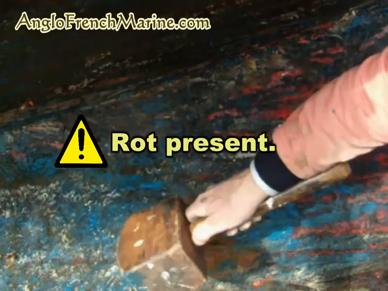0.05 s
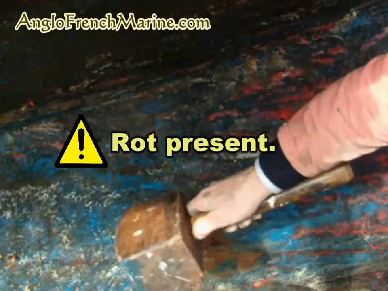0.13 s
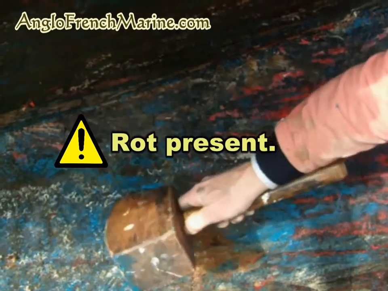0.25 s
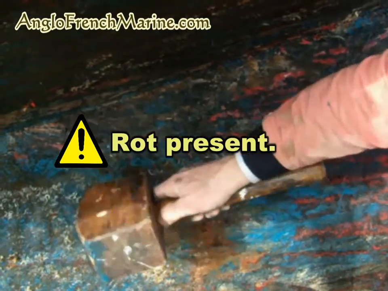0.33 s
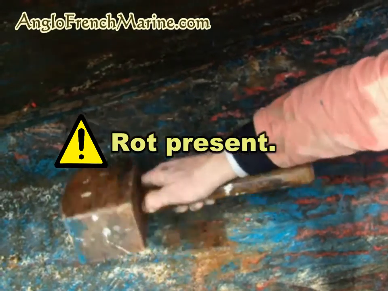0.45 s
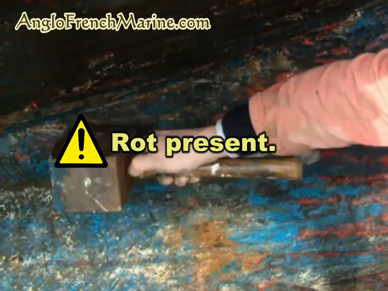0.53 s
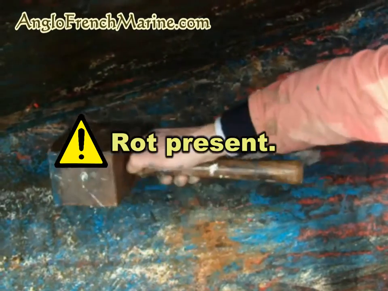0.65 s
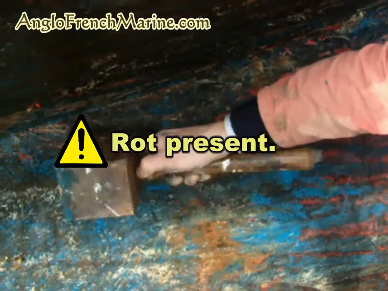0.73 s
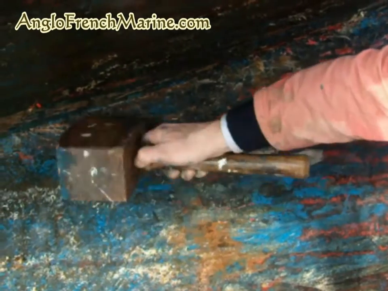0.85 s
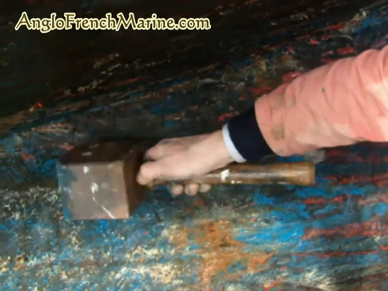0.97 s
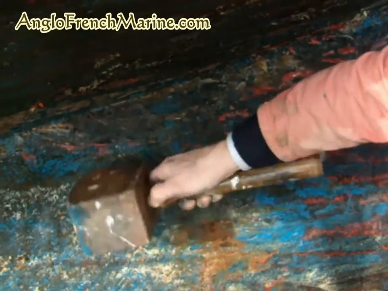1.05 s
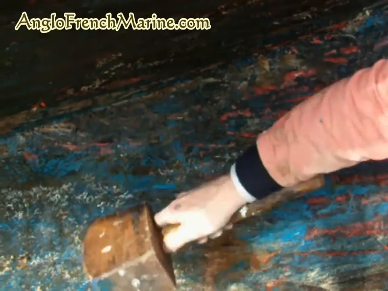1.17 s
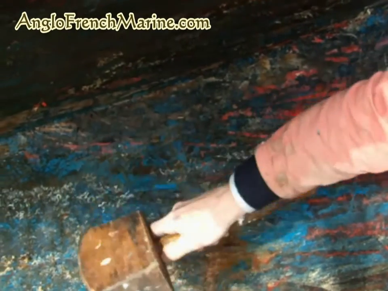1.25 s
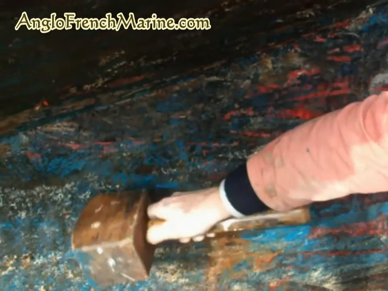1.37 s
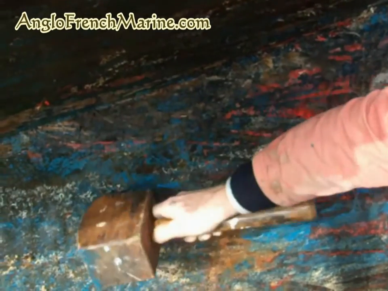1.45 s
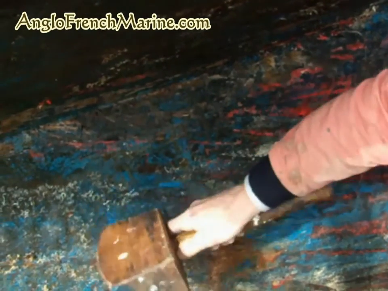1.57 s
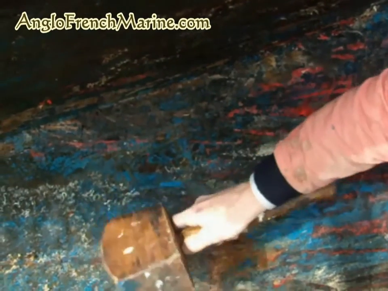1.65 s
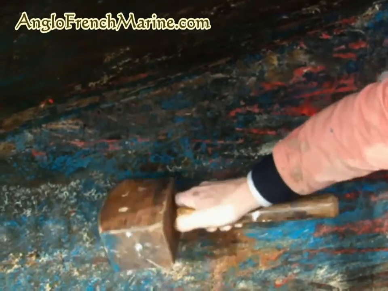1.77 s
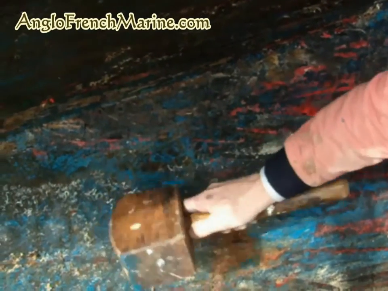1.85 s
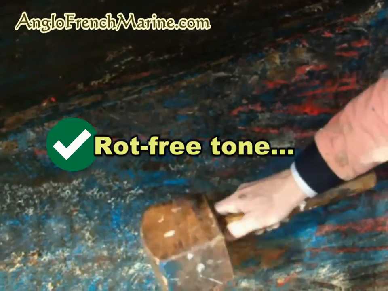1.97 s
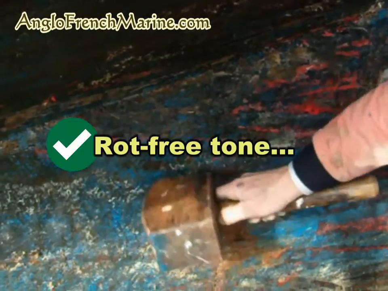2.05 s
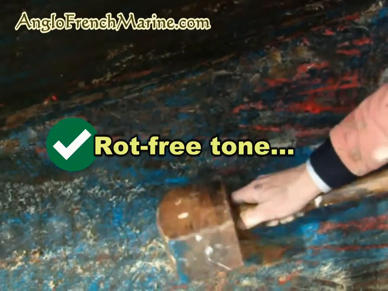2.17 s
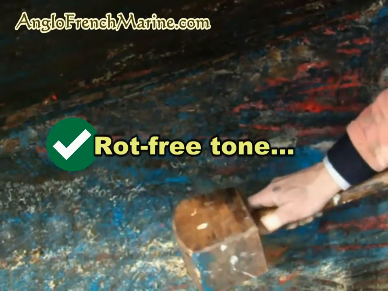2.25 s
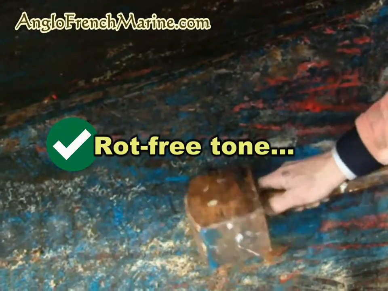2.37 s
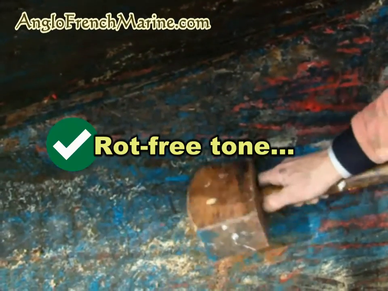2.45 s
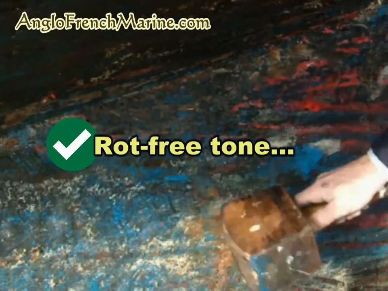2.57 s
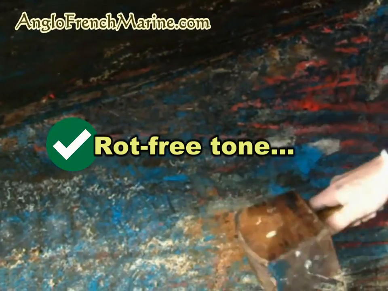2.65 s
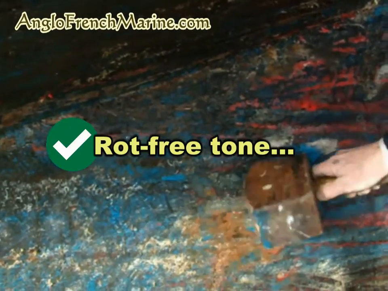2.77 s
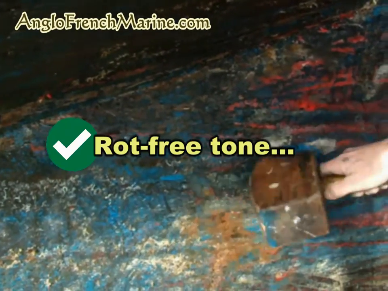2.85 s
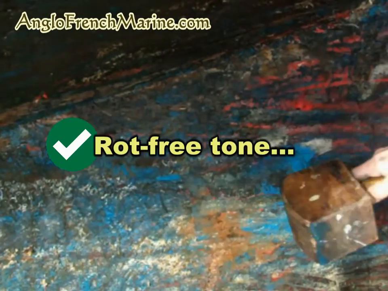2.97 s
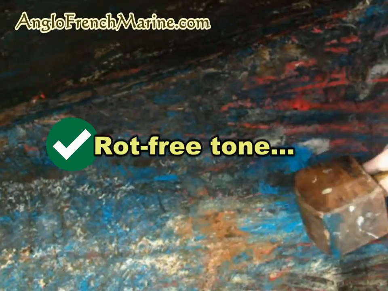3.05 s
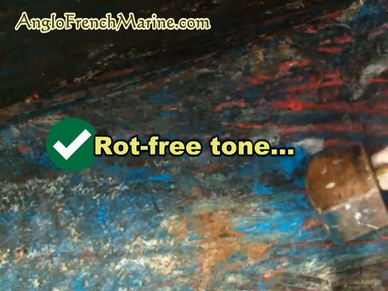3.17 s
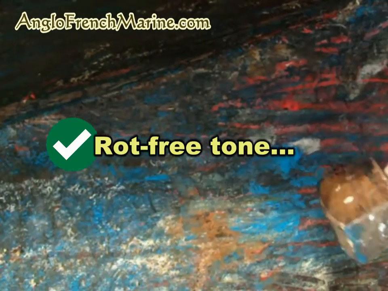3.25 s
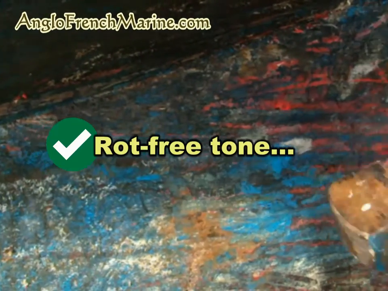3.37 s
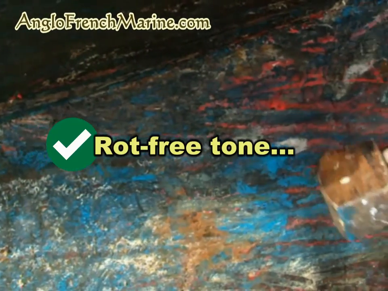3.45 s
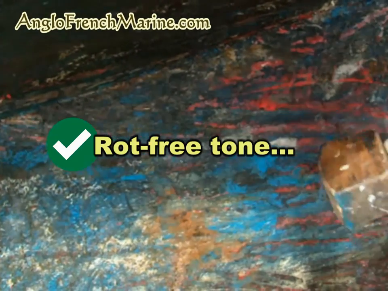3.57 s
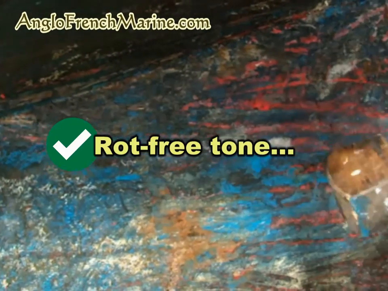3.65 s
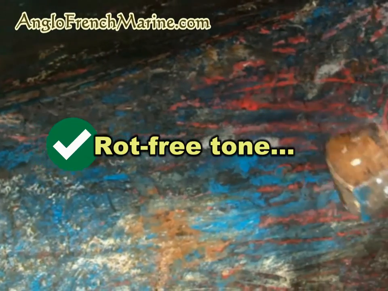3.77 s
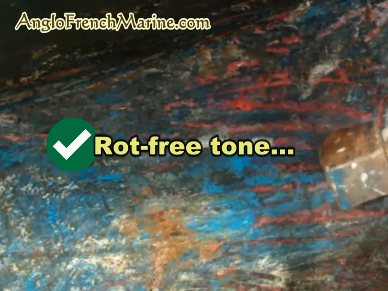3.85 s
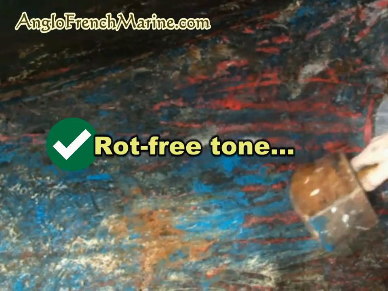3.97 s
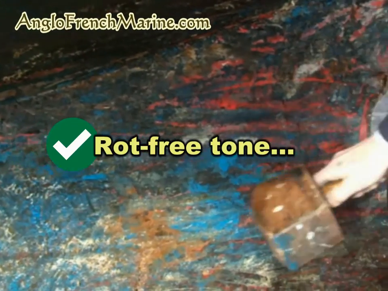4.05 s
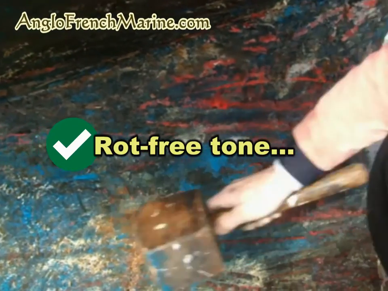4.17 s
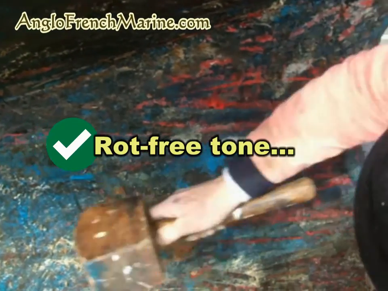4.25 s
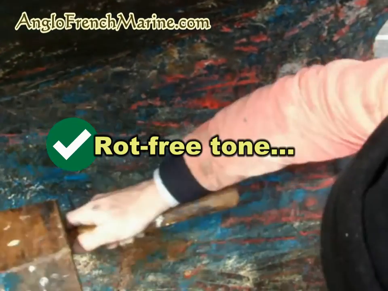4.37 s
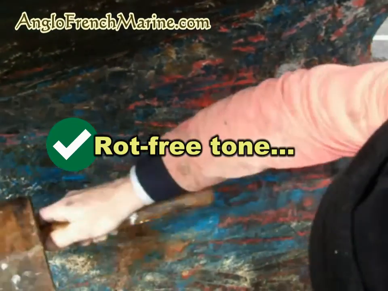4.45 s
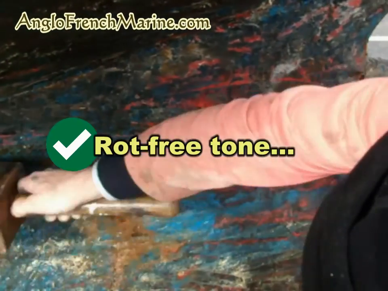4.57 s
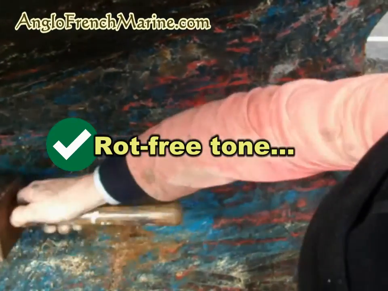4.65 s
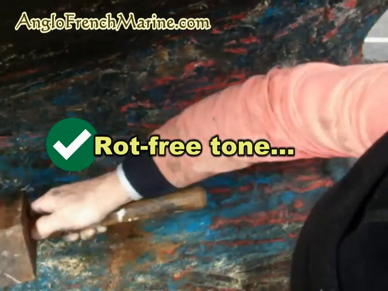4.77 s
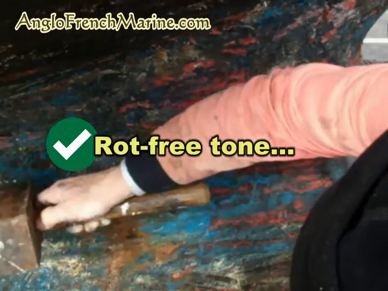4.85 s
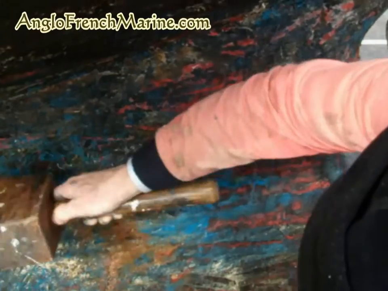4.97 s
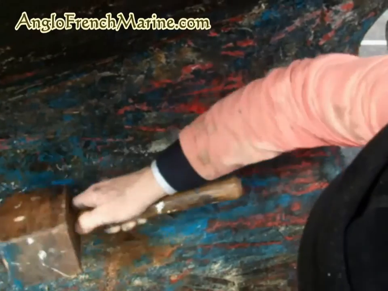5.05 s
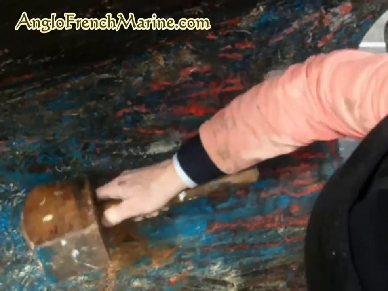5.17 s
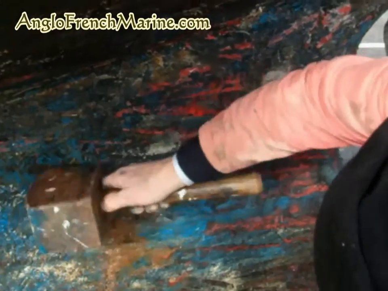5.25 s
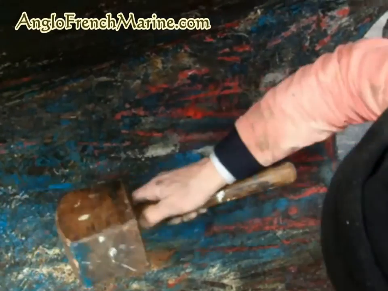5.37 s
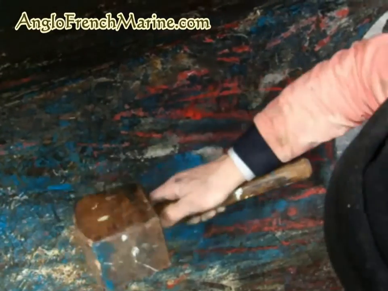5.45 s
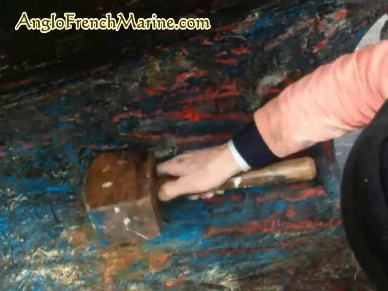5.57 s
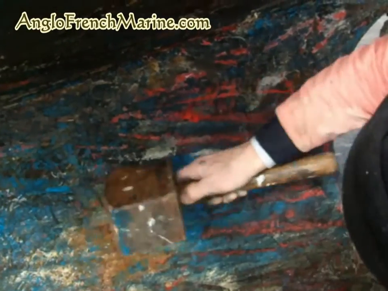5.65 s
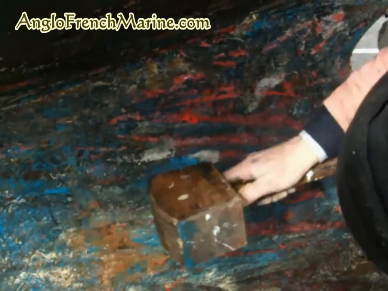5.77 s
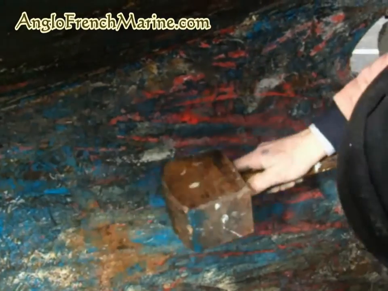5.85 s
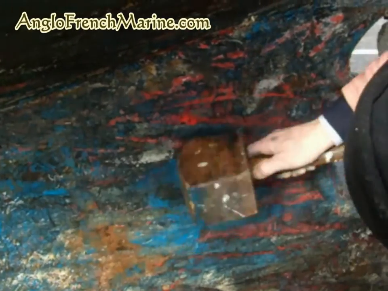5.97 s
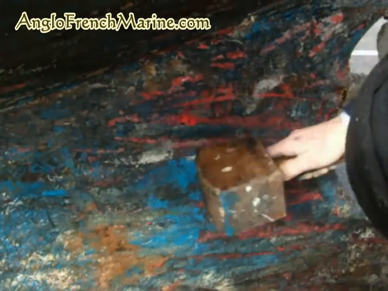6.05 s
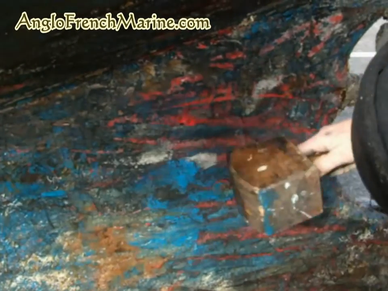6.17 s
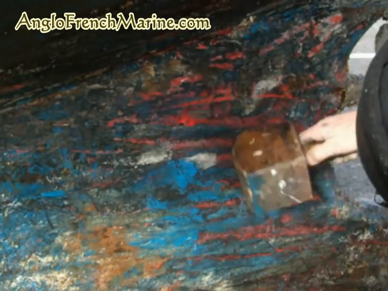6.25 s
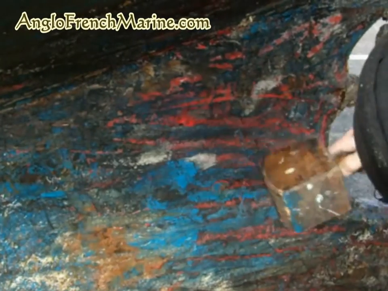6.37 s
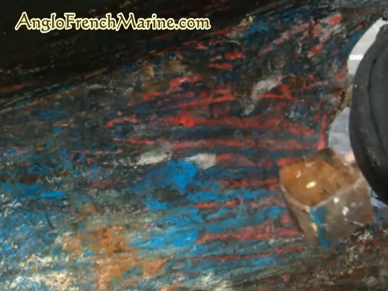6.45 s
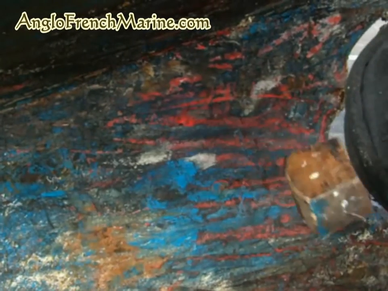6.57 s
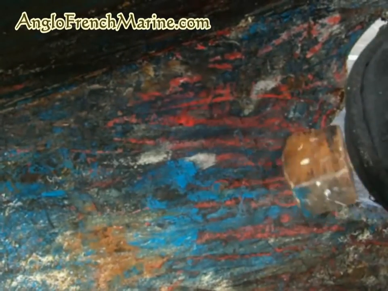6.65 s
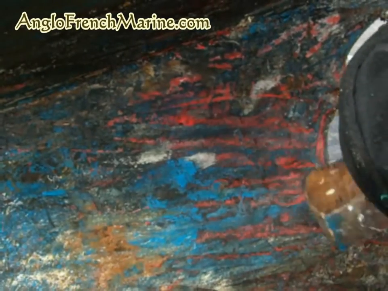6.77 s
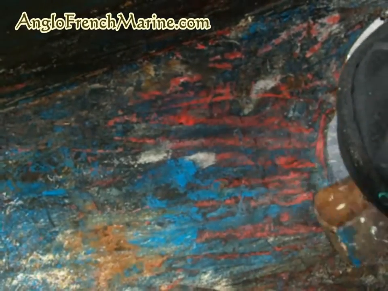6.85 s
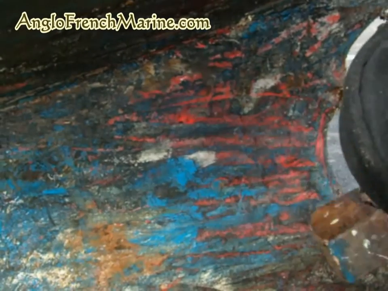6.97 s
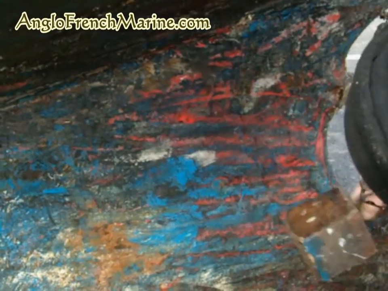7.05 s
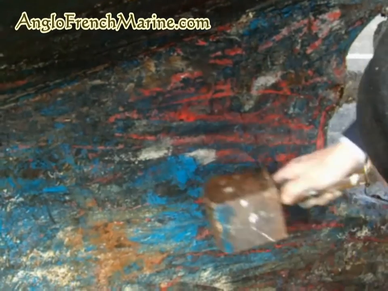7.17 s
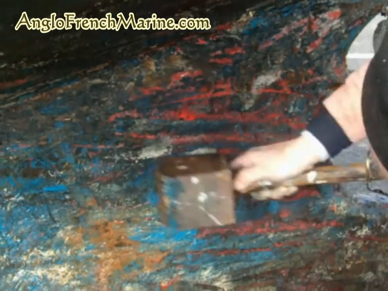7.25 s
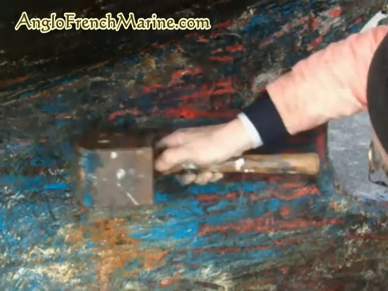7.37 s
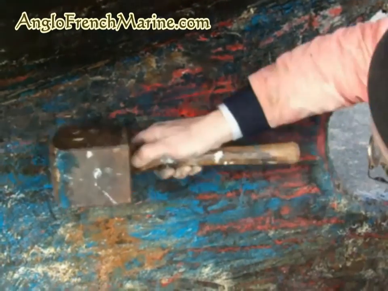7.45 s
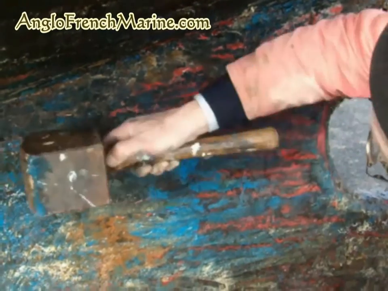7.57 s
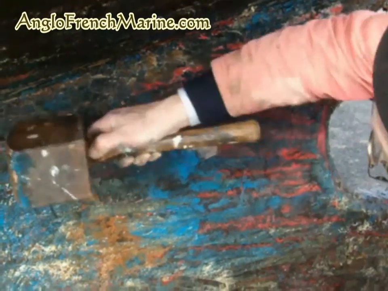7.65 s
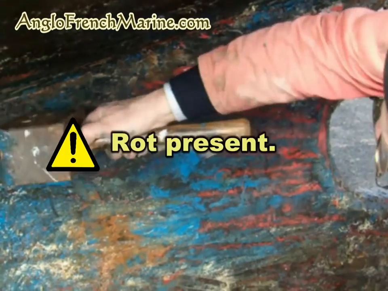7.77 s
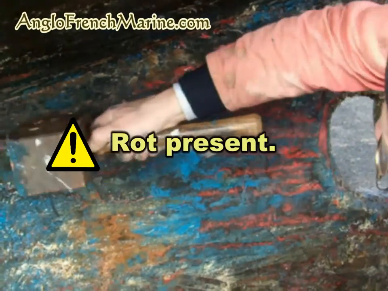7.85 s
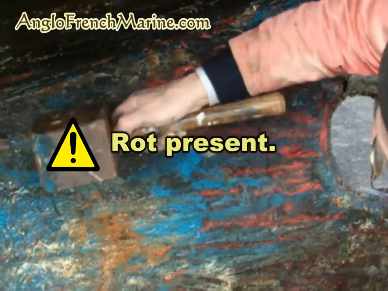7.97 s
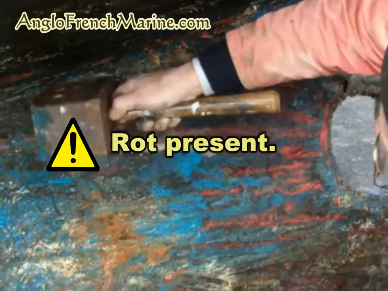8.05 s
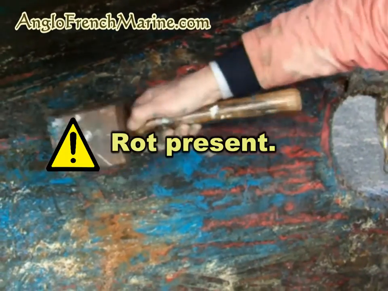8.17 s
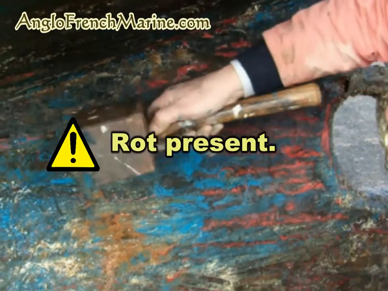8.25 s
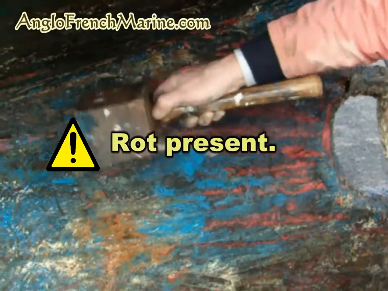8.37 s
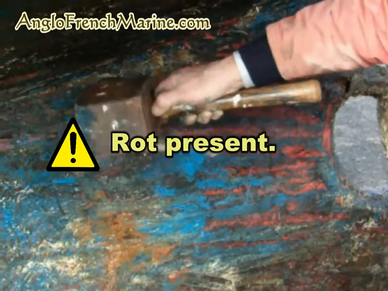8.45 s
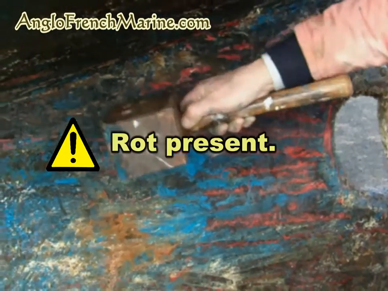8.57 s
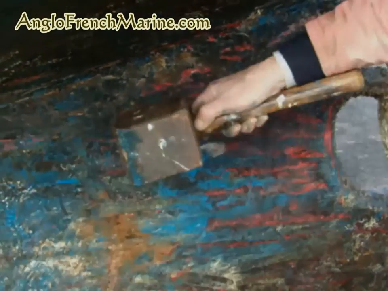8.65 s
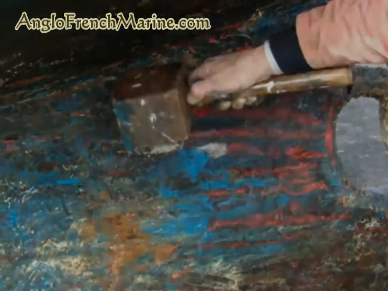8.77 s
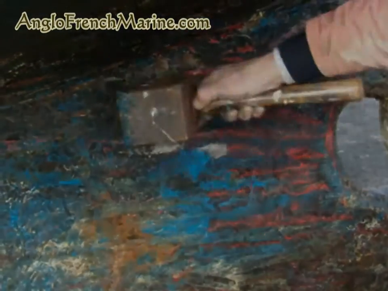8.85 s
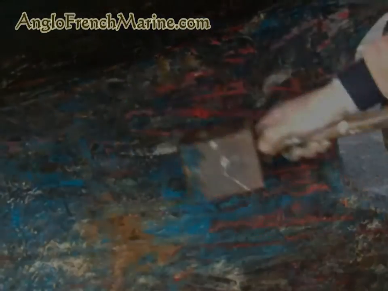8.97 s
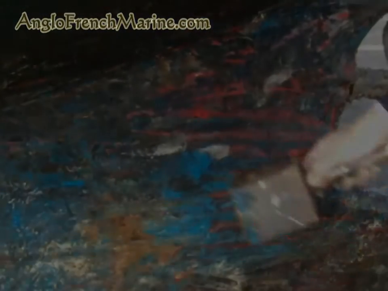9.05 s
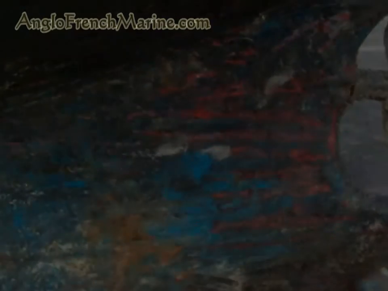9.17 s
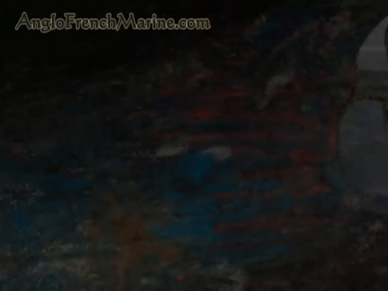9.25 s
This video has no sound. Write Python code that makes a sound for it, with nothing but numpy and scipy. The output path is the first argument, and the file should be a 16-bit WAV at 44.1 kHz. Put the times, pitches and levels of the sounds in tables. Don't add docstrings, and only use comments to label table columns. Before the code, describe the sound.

Steady mallet blows on a wooden hull outdoors, mostly loud, hollow and resonant, with short dull knocks first and dead thuds last.

```python
import sys
import numpy as np
from scipy import signal
from scipy.fft import rfft, irfft, next_fast_len
from scipy.io import wavfile
from scipy.ndimage import uniform_filter1d, minimum_filter1d, map_coordinates

SR = 44100
rng = np.random.default_rng(int(sys.argv[2]) if len(sys.argv) > 2 else 0)


def voltage_ratio(level):
    return 10 ** (np.asarray(level, float) / 20)


def transcribe(signal):
    frames = np.atleast_2d(signal).T
    limited = np.clip(frames, -1, 1)
    pcm = np.round(limited * 32767).astype(np.int16)
    wavfile.write(sys.argv[1], SR, pcm)


N = 410571

# (time [s], force [dB], hardness [dB], high note of the spot [Hz], echo peak [dB], plank)
SOUND_BLOWS = [(1.411, -1.5, 1, 839, -30.5, "fore"), (1.7363, -1, -3.5, 458, -33, "fore"),
               (2.0798, 0, 2.5, 696, -23.5, "middle"), (2.4296, 1.5, 1.5, 693, -23.5, "middle"),
               (2.789, 2.5, -3, 555, -25, "middle"), (3.1423, 1, 0, 809, -22.5, "aft"),
               (3.4911, 0.5, -6, 368, -28, "rib"), (3.8327, 1.5, -2, 475, -24.5, "rib"),
               (4.5985, 1.5, 1.5, 877, -30, "fore"), (4.9284, -.5, -2, 465, -31, "fore"),
               (5.2351, 0.4, -1, 693, -28, "middle"), (5.5787, -3, -1, 490, -30, "aft"),
               (5.9241, -1, -3.5, 295, -25, "aft"), (6.276, 1, 4.5, 803.4, -23.5, "rib"),
               (6.6451, -1.6, 0, 399, -25, "rib")]
# (time [s], force [dB], hardness [dB], echo peak [dB])
ROT_BLOWS = [
    (0.608, -9, -7, -45),
    (0.85, -0.7, 2.5, -33.5),
    (7.7154, -0.3, -2.5, -46),
    (8.062, 0.8, -7.5, -43),
    (8.417, 1.5, 1.5, -45),
]
SOUND_BAND_HZ = [240, 370, 520, 800, 1700]
ROT_BAND_HZ = [140, 260, 450, 780, 1700]
# (frequency [Hz], level [dB], decay t60 [s], rise [s])
SOUND_MODES = [(100.3, -7.5, 0.28, 0.004), (135, -1.5, 0.23, 0.013), (161.4, -14.5, 0.74, 0.0088),
               (179.9, 2.5, 0.23, 0.0099), (235, 0, 0.14, 0.012), (272.3, 4, 0.089, 0.021),
               (306, 0, .14, 0.0022), (379, -2.5, 0.083, 0.00062), (465, 4.5, 0.11, 0.00071),
               (533.8, 1.5, 0.1, 0.00073), (600, -0.5, 0.1, 0.0004), (743, 8, 0.078, .001),
               (812.4, 5, 0.079, 0.00033), (875.2, 4.5, 0.082, 0.00033), (988.6, -3.5, 0.08, 0.00063),
               (1256, -2.5, 0.077, 0.0028), (1370, -10.5, 0.023, .001), (2080, -6.5, 0.061, 0.00033)]
DAMP_MODES = [(62, -16.5, 0.34, 0.0088), (127.5, 6, 0.083, 0.0026), (188.2, 2, 0.21, 0.0072),
              (253.7, -4.5, 0.2, 0.009), (327.7, -2, 0.09, 0.0012), (404, 2, 0.06, 0.0012),
              (493, 10.5, 0.035, 0.0011), (610, 1, 0.1, 0.0036), (860, -6, 0.036, 0.00067),
              (1295, 5.5, 0.027, 0.0011), (2105, 0.5, 0.018, 0.0015)]
PUNKY_MODES = [(71.2, -6, 0.19, 0.014), (126, 2.5, 0.13, 0.0031), (145.6, 13.5, 0.054, 0.0051),
               (187.5, 5, 0.18, 0.0037), (244, 5.5, 0.066, 0.0034), (314, 5, 0.069, 0.0069),
               (390, 7.5, 0.087, 0.0016), (625, 0.5, 0.084, 0.00099), (723, 1, 0.024, 0.00091)]
PLANKS = {"fore": ([241, 399], [-13, -13, -11.5, -15, -22]), "middle": ([242, 398],
          [-11.5, -10, -12.5, -15.5, -21.5]), "aft": ([237, 365], [-9.5, -11, -8.5, -14.5, -21]),
          "rib": ([213, 368], [-5.5, -12, -9.5, -16.5, -22])}
# (level [dB], decay t60 [s], rise [s])
PLANK_NOTES = [(3, 0.16, 0.0061), (5, 0.094, .002), (7, 0.068, 0.0015)]
DAMP_COLOUR = [-8, -11, -13, -27, -28]
PUNKY_COLOUR = [-11.5, -13, -29, -43, -35.5]
HARD_REACH = [.05, .05, 0.65, 1.1, .6]
# (frequency [Hz], decay t60 [s])
WASH_DECAY = [(60, 0.34), (170, 0.89), (230, 0.52), (330, 0.48), (600, 0.31), (1200, .25), (4000, 0.14)]
# (frequency [Hz], level [dB])
WASH_COLOUR = [(40, -1.5), (100, -4.5), (1000, 4), (1300, -4), (2500, -1), (5000, -14), (10000, -30)]
# (frequency [Hz], level [dB])
WALL_COLOUR = [(100, -16), (250, -6), (360, 5.5), (520, 5.5), (700, 2), (1000, -5), (2000, -21.5),
               (5000, -33.5)]
# (time [s], peak level [dB], frequency [Hz])
TICKS = [
    (4.2158, -38, 966.5),
    (4.2744, -42, 800),
    (4.3494, -41, 739),
    (5.4999, -37, 3380),
    (7.2918, -36.5, 1500),
    (7.3615, -42, 3366),
    (7.452, -37, 1230),
    (7.474, -39, 770),
]
# (time [s], level [dB])
TRAFFIC = [(0.0, -45), (0.42, -53), (0.78, -40), (1.0, -45.5), (2.74, -43.5), (3.79, -42.5), (4.28, -46.5),
           (4.5, -47.5), (5.16, -39.5), (5.6, -42.5), (6.08, -43.5), (6.98, -43), (7.6, -48), (7.98, -44),
           (8.5, -45.5)]
# (frequency [Hz], level per Hz [dB])
RUMBLE_COLOUR = [(7, -40.5), (12, -6.5), (30, 1), (55, -1), (80, -2.5), (110, -12), (170, -10.5),
                 (250, -20.5), (400, -23.5), (880, -120)]
# (time [s], frequency [Hz], level [dB])
ENGINE = [(0, 56.9, -47.5), (1.2, 57.1, -37.5), (2.5, 55, -57.5), (4, 58, -38.5), (4.45, 56.16, -49),
          (5, 55.5, -36), (5.5, 55.55, -32.5), (6.1, 52.62, -32), (6.9, 54.55, -48), (7.5, 58.96, -32.5),
          (8.5, 62, -39)]
# (frequency [Hz], level per Hz [dB])
HISS_COLOUR = [(120, -30), (200, -10.5), (300, -7.5), (530, -7.5), (1080, -13), (2080, -13), (3100, -15),
               (4000, -18), (5000, -21.5), (6300, -29.5), (7000, -61), (10000, -42), (11500, -34.5),
               (13000, -35), (15000, -75.5)]
# (frequency [Hz], gain [dB])
MIC_RESPONSE = [(1500, -0.5), (3000, -3.5), (6000, -6), (7400, -7.5), (8100, -21), (9500, -2), (12500, -15),
                (16000, -41)]
# (frequency [Hz], gain [dB])
LEAN = [(100, .25), (300, .25), (600, .5), (1000, .65), (2000, .6), (6000, .7)]
# (frequency [Hz], level [dB])
CLINGING_NOISE = [(100, -36), (500, -30), (1200, -27.5), (2500, -20.5), (5000, -9), (8000, 2.5), (15000, 9)]
# (frequency [Hz], level [dB])
FAINTEST_LINE = [(3000, -130), (4500, -108), (6500, -100), (7600, -91), (10000, -97.5), (13000, -99.5),
                 (16000, -94)]
# (time [s], low edge [Hz])
TREBLE_GAPS = [(.47, 1194), (.53, 1194), (.64, 3700), (.68, 1670), (.73, 800), (.772, 1190), (.89, 3000),
               (.93, 3000), (1.625, 1490), (1.775, 2720), (1.82, 1580), (3.038, 900), (3.233, 1700),
               (3.877, 3200), (4.83, 1190), (7.633, 3900), (7.733, 3730), (8.098, 1490), (8.48, 3890)]
# (time [s], low edge [Hz])
BAND_GAPS = [(.92, 1040), (2.0, 1630), (3.41, 1500), (5.024, 1626), (5.463, 1370), (5.665, 1600),
             (8.5, 1000)]
# (time [s], level [dB])
LEADING_HISS = [
    (3.49, -26),
    (5.578, -35),
    (5.924, -29.5),
]
# (frequency [Hz], level [dB])
LEADING_COLOUR = [(1900, -38.5), (2300, -0.5), (3300, 1), (3700, -14.5), (4900, -6), (5800, -13.5),
                  (6500, -40.5)]

ECHO_S = .2168
END_S = 8.563


def unit(x):
    return x / np.sqrt(np.mean(x ** 2) + 1e-20)


def along(points, hz):
    f, v = np.transpose(points)
    return np.interp(np.log(hz + 1), np.log(f + 1), v)


def curves(rows):
    s, *cols = np.transpose(rows)
    return [np.interp(np.arange(N) / SR, s, c) for c in cols]


def wobble(rate):
    knots = rng.standard_normal(int(N * rate / SR) + 4)
    return map_coordinates(knots, [np.arange(N) * rate / SR])


def coloured(x, points):
    size = next_fast_len(len(x) + 8192)
    gain = voltage_ratio(along(points, np.fft.rfftfreq(size, 1 / SR)))
    return irfft(rfft(x, size) * gain, size)[:len(x)]


def placed(rows, sounds):
    out = np.zeros(N + SR)
    for (s, *_), sound in zip(rows, sounds):
        out[round(s * SR):][:len(sound)] += sound
    return out[:N]


def struck(s, force_db, hard_db, colour_db):
    return (s, *(np.array(colour_db) + force_db + hard_db * np.array(HARD_REACH)))


def ringing(modes, spot, t, spread_db, detune, loose, snap, snap_s):
    hz, level, t60, rise = np.array(modes).T[..., None]
    level_luck, pitch_luck, phase_luck = rng.standard_normal((3, len(modes), 1))
    fade = voltage_ratio(level + along(spot, hz) + spread_db * level_luck - 60 * t / t60)
    burst = 1 + snap * np.exp(-t / snap_s)
    swell = (1 - np.exp(-t / rise)) ** 2
    tone = np.sin(2 * np.pi * hz * (1 + detune * pitch_luck) * t + loose * phase_luck)
    return (fade * burst * swell * tone).sum(0)


def mallet_crack(level_db, t, rise_s, crack_s, blunt_hz):
    swell = (1 - np.exp(-t / rise_s)) ** 2
    crack = rng.standard_normal(len(t)) * voltage_ratio(level_db - 60 * t / crack_s) * swell
    return signal.lfilter(*signal.butter(4, blunt_hz, fs=SR), crack)


def wash(spot, size):
    hz, t, z = signal.stft(rng.standard_normal(size), SR, nperseg=512)
    per_hz_db = 10 * np.log10(hz / 300 + 0.033)
    gain_db = along(spot, hz) + along(WASH_COLOUR, hz) - per_hz_db
    fade_db = 60 * t / along(WASH_DECAY, hz)[:, None]
    return signal.istft(z * voltage_ratio(gain_db[:, None] - fade_db), SR, nperseg=512)[1][:size]


def blows(rows, band_hz, woods, bass_db, ring_db, wash_db, crack_db, crack_s, blunt_hz, **ring):
    t = np.arange(SR * 3 // 4) / SR
    sounds = []
    for (s, *spot_db), modes in zip(rows, woods):
        spot = [(band_hz[0] * 0.6, bass_db), *zip(band_hz, spot_db)]
        tone = voltage_ratio(ring_db) * ringing(modes, spot, t, **ring)
        crack = mallet_crack(spot_db[-1] + crack_db, t, modes[-1][3], crack_s, blunt_hz)
        tail = voltage_ratio(wash_db) * wash(spot, len(t)) * (1 - np.exp(-t / .006))
        sounds.append(tone + crack + tail)
    return sounds


def sound_planks():
    rows, woods = [], []
    for s, force_db, hard_db, high_hz, _, plank in SOUND_BLOWS:
        notes_hz, colour_db = PLANKS[plank]
        rows.append(struck(s, force_db, hard_db, colour_db))
        woods.append(SOUND_MODES + [(hz, *note) for hz, note in zip([*notes_hz, high_hz], PLANK_NOTES)])
    return blows(rows, SOUND_BAND_HZ, woods, bass_db=-14.5, ring_db=-4.0, spread_db=1.53, detune=0.0081,
                 loose=0.71, snap=3.68, snap_s=0.0064, wash_db=2.0, crack_db=11.5, crack_s=0.037, blunt_hz=5107)


def damp_knocks():
    rows = [struck(*row[:3], DAMP_COLOUR) for row in ROT_BLOWS[:2]]
    return blows(rows, ROT_BAND_HZ, [DAMP_MODES] * len(rows), bass_db=-15.5, ring_db=-1.5, spread_db=5.0,
                 detune=0.025, loose=0.05, snap=1.52, snap_s=0.0084, wash_db=-3, crack_db=15.5,
                 crack_s=0.023, blunt_hz=5634)


def punky_thuds():
    rows = [struck(*row[:3], PUNKY_COLOUR) for row in ROT_BLOWS[2:]]
    return blows(rows, ROT_BAND_HZ, [PUNKY_MODES] * len(rows), bass_db=-11.5, ring_db=-3.0, spread_db=3.0,
                 detune=0.0073, loose=.1, snap=0.88, snap_s=0.0082, wash_db=-3, crack_db=13,
                 crack_s=0.038, blunt_hz=4170)


def far_wall(echoes, sounds):
    t = np.arange(SR // 2) / SR
    out = []
    for (s, db), x in zip(echoes, sounds):
        head = x[:len(t)] * np.exp(-t / .012) * (1 - np.exp(-t / .005))
        head = coloured(head, WALL_COLOUR)
        yard_tail = rng.standard_normal(len(t)) * voltage_ratio(-38 - 60 * t / 0.79)
        scatter = signal.fftconvolve(head, yard_tail)[:len(t)]
        out.append(voltage_ratio(db - 8) * (head + scatter) / np.abs(head).max())
    return placed(echoes, out)


def ticks():
    t = np.arange(SR // 40) / SR
    grains = []
    for s, db, hz in TICKS:
        grain = rng.standard_normal(len(t)) + .7 * np.sin(2 * np.pi * hz * t)
        grains.append(voltage_ratio(db - 60 * t / 0.011) * grain)
    return coloured(placed(TICKS, grains), [(300, -48.0), (800, -7.5), (2500, 0.5), (5000, -2.5), (8000, -32)])


def engine_drone():
    hz, db = curves(ENGINE)
    phase = 2 * np.pi * np.cumsum(hz + 1.5 * wobble(6)) / SR
    return voltage_ratio(db - 9 + 3 * wobble(5)) * np.sin(phase)


def traffic_rumble():
    level_db, = curves(TRAFFIC)
    return voltage_ratio(level_db + 0.7 * wobble(2)) * unit(coloured(rng.standard_normal(N), RUMBLE_COLOUR))


def hiss():
    passing_db = 3.5 * np.exp(-np.arange(N) / SR / 0.099)
    level_db = -58.5 + passing_db + 1.0 * wobble(15)
    return voltage_ratio(level_db) * unit(coloured(rng.standard_normal(N), HISS_COLOUR))


def scene():
    hits = sound_planks() + damp_knocks() + punky_thuds()
    hull = placed(SOUND_BLOWS + ROT_BLOWS, hits)
    echoes = [(row[0] + ECHO_S, row[4]) for row in SOUND_BLOWS]
    echoes += [(row[0] + ECHO_S, row[3]) for row in ROT_BLOWS]
    mono = hull + far_wall(echoes, hits) + ticks() + engine_drone() + traffic_rumble() + hiss()
    return np.tile(mono, (2, 1))


def patches(shape, lines, frames, share):
    lucky = rng.random((shape[0] // lines + 1, shape[1] // frames + 1)) < share
    return lucky.repeat(lines, axis=0).repeat(frames, axis=1)[:shape[0], :shape[1]]


def roughened(x):
    hz, t, z = signal.stft(x, SR, nperseg=2048, noverlap=1024)
    size = np.sqrt(np.abs(uniform_filter1d(np.abs(z) ** 2, size=9, axis=1)))
    mid, side = rng.standard_normal(z.shape) + 1j * rng.standard_normal(z.shape)
    noise = np.array([mid + .35 * side, mid - .35 * side])
    z = z + size * voltage_ratio(along(CLINGING_NOISE, hz))[:, None] * noise

    centre, apart = z.mean(0), (z[0] - z[1]) / 2
    blow = size[0].max(0) > voltage_ratio(-22)
    wide = blow | (np.abs(apart) > voltage_ratio(-71)) & (hz[:, None] > 400)
    z = centre + np.array([1, -1])[:, None, None] * apart * wide

    busy = -minimum_filter1d(-size[0].max(0), size=21) > voltage_ratio(-30)
    floor_db = along(FAINTEST_LINE, hz)[:, None] + 8 * busy * (hz[:, None] > 8000)
    z = z * (np.abs(z.mean(0)) > voltage_ratio(floor_db))
    lucky = patches((len(hz), len(t)), 8, 1, .3)
    z = z * np.where(hz[:, None] > 7600, voltage_ratio(1) * lucky + .08, 1)
    return signal.istft(z, SR, nperseg=2048, noverlap=1024)[1][:, :N]


def dropouts(x):
    hz, t, z = signal.stft(x, SR, nperseg=1024)
    keep = np.ones(z.shape[1:])
    gaps = [(s, edge_hz, 9000) for s, edge_hz in TREBLE_GAPS]
    gaps += [(s, edge_hz, 2.1 * edge_hz) for s, edge_hz in BAND_GAPS]
    for s, low_hz, high_hz in gaps:
        keep[np.ix_((hz > low_hz) & (hz < high_hz), (t > s) & (t < s + .058))] = 0
    keep = np.maximum(keep, patches(keep.shape, 6, 3, .1))
    return signal.istft(z * keep, SR, nperseg=1024)[1][:, :N]


def leading_swells():
    lead_s = 0.0091
    swell = np.linspace(.4, 1, round(lead_s * SR))
    bursts = [voltage_ratio(db) * swell * unit(coloured(rng.standard_normal(len(swell)), LEADING_COLOUR))
              for s, db in LEADING_HISS]
    return placed([(s - lead_s,) for s, db in LEADING_HISS], bursts)


def roll_off(x):
    return signal.sosfilt(signal.butter(12, 16000, fs=SR, output="sos"), x)


def record(dry):
    hot = voltage_ratio(8.5) * dry
    clipped = hot / (1 + np.abs(hot / .99) ** 16) ** (1 / 16)
    ports = []
    for channel, sign in zip(clipped, (-1, 1)):
        lean = [(hz, sign * db) for hz, db in LEAN]
        ports.append(coloured(coloured(channel, MIC_RESPONSE), lean))
    rough = dropouts(roughened(np.array(ports))) + leading_swells()
    gate = np.clip((END_S - np.arange(N) / SR) / .004, 0, 1)
    return roll_off(np.clip(rough - .0038, -1, 1) * gate)


dry = scene()
out = record(dry)
transcribe(out)
```